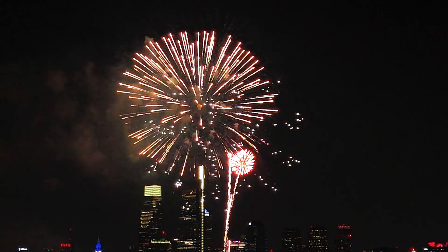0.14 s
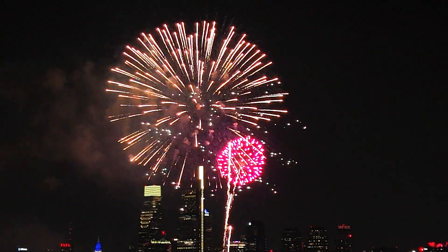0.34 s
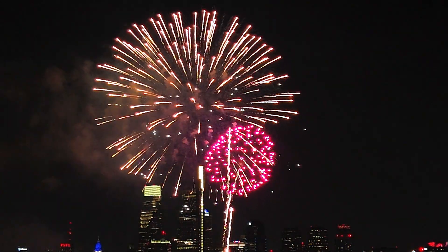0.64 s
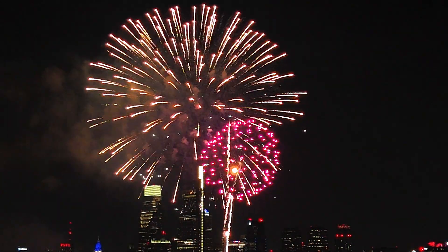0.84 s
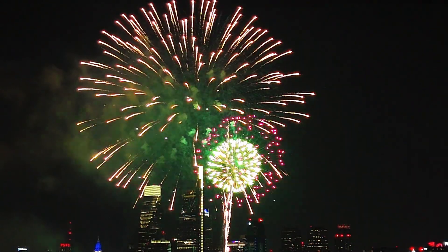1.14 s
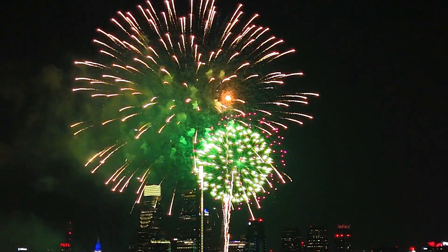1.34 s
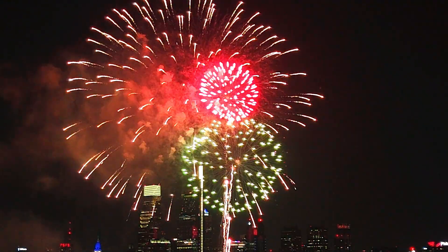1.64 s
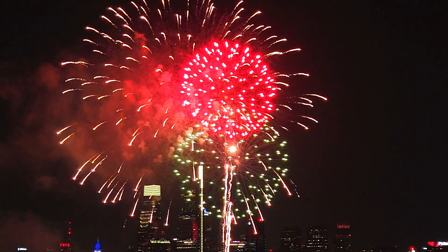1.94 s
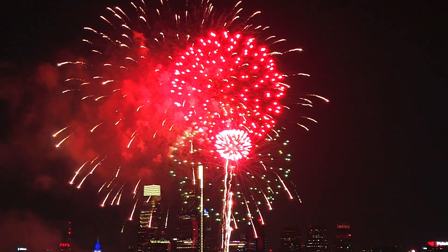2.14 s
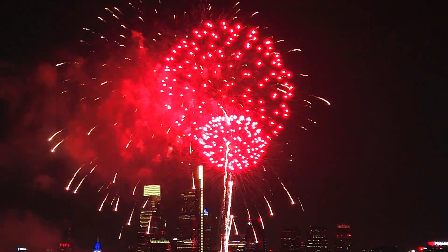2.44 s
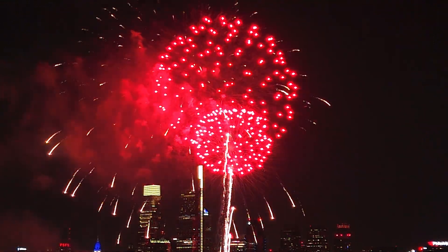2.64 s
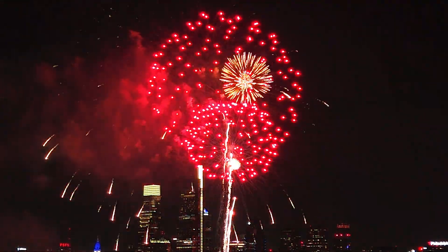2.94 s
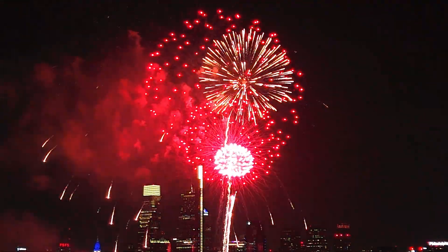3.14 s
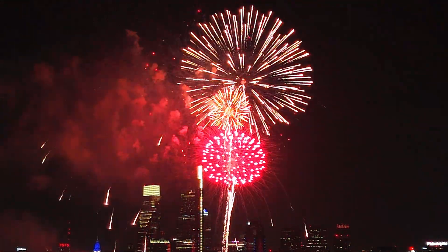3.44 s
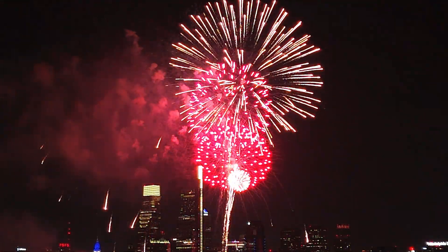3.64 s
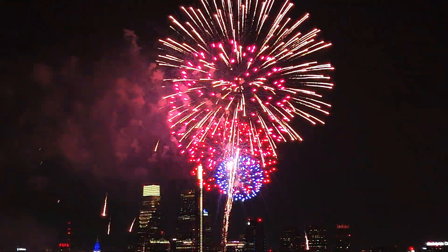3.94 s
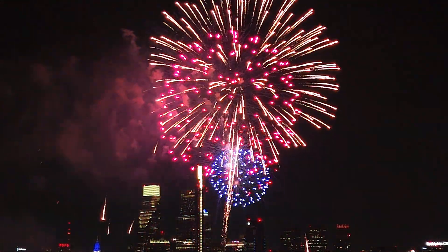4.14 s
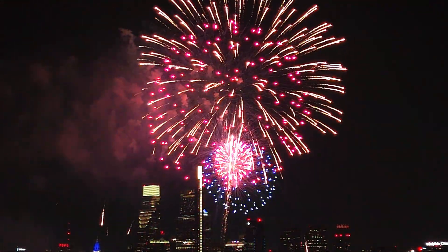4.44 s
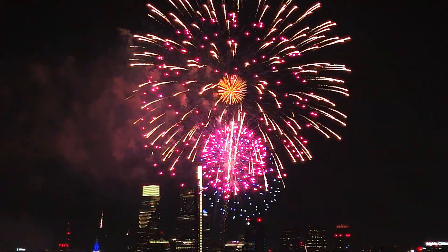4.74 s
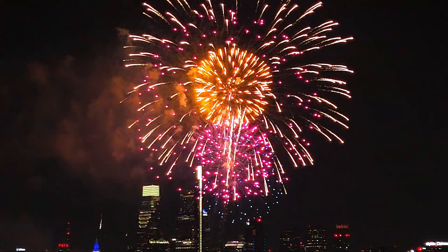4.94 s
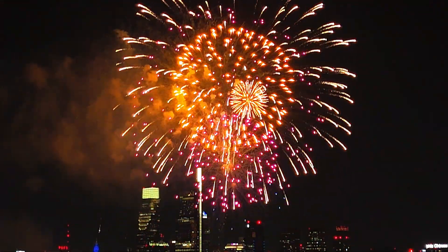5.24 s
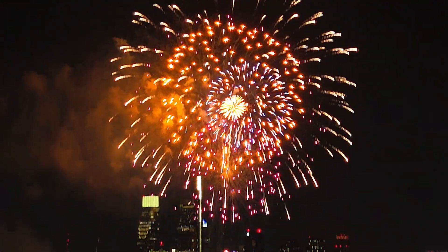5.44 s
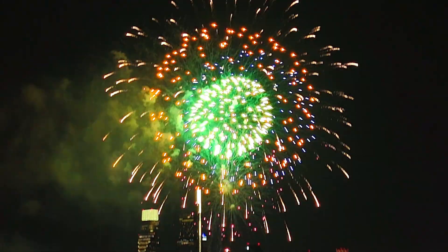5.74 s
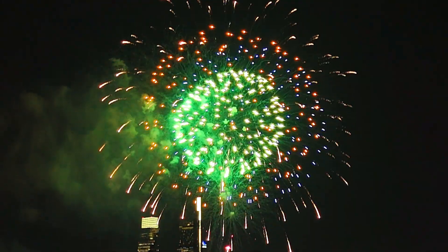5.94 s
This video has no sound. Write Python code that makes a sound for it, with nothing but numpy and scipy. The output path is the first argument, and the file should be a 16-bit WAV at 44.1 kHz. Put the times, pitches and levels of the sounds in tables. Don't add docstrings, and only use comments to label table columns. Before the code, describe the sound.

A wide outdoor night scene of aerial fireworks over a city, picked up by a small camera microphone with little deep bass and a thin steady hiss. For the first 1.3 seconds there are only muttering old echoes, soft launch thuds and muffled far pops, one stronger at 1.2. A big, abrupt, overloaded bang strikes at 1.4, slapping off near walls with bright scatter and a rolling city echo. A weaker one follows at 2.0, then a heavy launch thud at 2.6 and bangs at 2.9, 3.4 (the hardest) and 3.9, the last duller. Muffled pops cluster from 3.6 to 5.1. Double bangs land at 4.8 and 4.9, then 5.37 and 5.44, nearly merging. Faint sharp cracks occur near 1.2, 1.9, 4.3 and 5.95, with tiny spark ticks after 5. Rumbling echoes fade towards 6 seconds, with a last far pop and soft thud.

```python
import sys
import numpy as np
from scipy import signal
from scipy.fft import rfft, irfft, next_fast_len
from scipy.io import wavfile
from scipy.ndimage import uniform_filter1d

SR = 44100
rng = np.random.default_rng(int(sys.argv[2]) if len(sys.argv) > 2 else 0)


def wrap_up_sound(samples):
    columns = np.atleast_2d(samples).T
    tamed = np.clip(columns, -1, 1)
    steps = np.round(tamed * 32767).astype(np.int16)
    wavfile.write(sys.argv[1], SR, steps)


def level_to_linear(level):
    exponent = np.asarray(level, float) / 20
    return 10 ** exponent


N = 269451

# frequency in Hz, level in dB per Hz.
HISS_SPECTRUM = [(900, -22), (1800, 2.5), (2800, 1.5), (3900, -2.5), (4400, -17), (5500, -16.5),
                 (7500, -16.5), (8200, -35.5), (10000, -28.5), (12500, -26.5), (15600, -24.5),
                 (16000, -63.5)]
# frequency in Hz, level in dB rms.
CIRCUIT_TONES = [(6050, -92.5), (12100, -109)]
# time in seconds, strength in dB, depth in dB (deeper when farther travelled).
OLD_ECHOES = [(0.0, -50.5, 2.5), (0.15, -45.5, 0), (0.41, -53, 2.5), (0.58, -45, 3.5), (0.92, -49, -10.5),
              (1.24, -45, -1), (1.6, -39, -17.5), (1.85, -43, -0.5), (2.1, -48, -17), (2.41, -50.5, -1.5),
              (2.85, -44, 12), (3.12, -49, 2), (3.61, -44.5, 11), (3.93, -47.5, 5.5), (4.5, -42.5, -3),
              (5.1, -35.5, 2), (5.449, -42, -3), (6.11, -40, -1.5)]
# frequency in Hz, level in dB per Hz.
BOOM_SPECTRUM = [(15, -74), (30, -47), (60, -12.5), (110, 2.5), (200, -6.5), (300, 3.5), (400, -18.5),
                 (600, -61), (1500, -130)]
# frequency in Hz, level in dB per Hz.
MUTTER_SPECTRUM = [(150, -24.5), (250, -8), (400, 6.5), (600, 3.5), (900, -1.5), (1150, -13), (1500, -31),
                   (2500, -70), (5000, -130)]
# frequency in Hz, level in dB per Hz.
RATTLE_SPECTRUM = [(300, -94.5), (700, -22.5), (1050, 3.5), (1350, 3.5), (1700, -6.5), (2100, -17.5),
                   (3200, -30), (4200, -46.5), (8000, -130)]
# start in seconds, peak in dB, centre in Hz.
LAUNCH_THUDS = [(0.02, -31, 142), (0.114, -26.5, 171), (0.659, -28.5, 207), (0.925, -28.5, 340),
                (1.826, -19.5, 131), (2.561, -20, 140.5), (2.643, -10, 114), (2.721, -24, 196),
                (3.101, -21.5, 140.5), (3.3, -28, 131), (3.513, -13.5, 293), (5.198, -23, 380),
                (6.061, -28, 286)]
# start in seconds, peak in dB, centre in Hz.
FAR_SHELLS = [(0.028, -31.5, 420), (0.125, -27, 510), (0.327, -32, 517), (0.498, -50, 356),
              (0.719, -33, 540), (1.2, -16.5, 450), (1.89, -28, 830), (2.606, -32.5, 547), (3.16, -28, 514),
              (3.354, -34, 510), (3.629, -18, 406), (3.804, -22, 560), (4.014, -21.5, 622),
              (4.261, -20, 620), (4.558, -16.5, 572), (4.676, -22, 620), (4.702, -23, 452),
              (4.959, -14, 434), (5.054, -11, 420), (5.931, -24, 584)]
# start in seconds, peak in dB, centre in Hz.
SHARP_CRACKS = [
    (1.2053, -35.5, 1140),
    (1.274, -42.5, 1370),
    (1.8988, -33, 1100),
    (4.2612, -34.5, 1330),
    (4.5608, -48, 1060),
    (5.9496, -38, 1330),
]
# start in seconds, peak in dB, centre in Hz.
SPARK_TICKS = [
    (5.032, -38, 7000),
    (5.231, -49, 5000),
    (5.256, -53, 5000),
    (5.955, -48, 3500),
    (6.107, -39, 2960),
]
# start in seconds, overload in dB, push length in ms, ground delay in ms,
# front sharpness in Hz.
SHOCK_WAVES = [
    (1.3664, 27.5, 6.3, 1.55, 1180),
    (2.0478, 20, 2.1, 1.024, 664),
    (2.8513, 25.5, 0.98, 0.79, 722),
    (3.4313, 32.5, 2.6, 1.633, 621),
    (3.8885, 30.5, 0.76, 1.24, 375),
    (4.8299, 29, 2.2, 1.59, 721),
    (4.898, 25, 0.87, 1.01, 492),
    (5.3663, 25.5, 2.2, 1.52, 687),
    (5.443, 30.5, 0.41, 0.9, 371),
]
# near walls in dB, spray in dB, spray T60 in seconds,
# spray tilt in dB per octave.
BURST_ECHOES = [(0.5, -38.5, 1.15, -7.5), (-10.5, -47, 0.84, -12.5), (-9.5, -44, 0.56, -10.5),
                (-7, -44.5, 0.81, -10.5), (-10, -45, 0.43, -10), (0.5, -36, 0.81, -7),
                (-7.5, -48, 1.26, -5), (-3, -40.5, 0.91, -8), (-10, -58, 0.73, -15)]
# frequency in Hz, level in dB per Hz.
WALL_SPECTRUM = [(40, -15), (120, -9.5), (230, -3), (400, -9), (800, -5), (1300, -11), (2000, -31),
                 (3700, -28.5), (4600, -42), (8800, -56), (15600, -67), (16000, -100)]
# frequency in Hz, T60 in seconds.
WALL_T60_S = [(60, 0.18), (250, 0.12), (1000, 0.044), (4000, 0.072), (12000, 0.034)]
# frequency in Hz, level in dB per Hz.
CITY_SPECTRUM = [(25, -55.5), (45, -37), (86, 1.5), (160, -1), (304, -0.5), (450, -3), (1100, -14.5),
                 (1600, -22), (2400, -51.5), (4000, -75.5), (8000, -130)]
# frequency in Hz, T60 in seconds.
CITY_T60_S = [(60, 1.3), (200, 1.04), (700, 1.14), (2000, 1)]
# frequency in Hz, level in dB per Hz.
SPRAY_SPECTRUM = [(1000, -7), (1900, 4), (3900, 2.5), (4500, -2.5), (7500, -3), (10000, -8), (15600, -21),
                  (16000, -48.5)]
# frequency in Hz, share of the spray T60.
SPRAY_T60_SHARE = [(2000, 1), (3300, 1), (5000, 0.87), (7500, 0.77), (8500, 0.55), (13000, 0.45)]
# frequency in Hz, sharpness Q.
BASS_ROLLOFFS = [(138, 0.89), (245, 0.32)]

HISS_DB, HISS_FOLLOWS = -69.5, 0.25
RATTLE_DB, RATTLE_FADES = -14, 0.35
CITY_DB, CITY_FOLLOWS = -16.5, 0.91
STRETCH = 0.79
GRAZING_MS, GROUND_LOSS_PER_MS = 1.25, 1.005


def unit(x):
    return x / np.sqrt(np.mean(x ** 2) + 1e-20)


def along(points, hz):
    point_hz, value = np.transpose(points)
    return np.interp(np.log(hz + 1), np.log(point_hz + 1), value)


def add(track, start_s, sound):
    part = track[max(round(start_s * SR), 0):][:len(sound)]
    part += sound[:len(part)]


def filtered(x, response):
    size = next_fast_len(len(x) + 8192)
    return irfft(rfft(x, size) * response(np.fft.rfftfreq(size, 1 / SR)), size)[:len(x)]


def patchy(count, patchy_db, shape=lambda hz, t: 1, frame=256):
    hz, t, z = signal.stft(rng.standard_normal(count), SR, nperseg=frame)
    field = uniform_filter1d(rng.standard_normal(z.shape), size=3, axis=0)
    field = uniform_filter1d(field, size=6, axis=1)
    gain = level_to_linear(patchy_db * unit(field)) * shape(hz[:, None], t)
    return signal.istft(z * gain, SR, nperseg=frame)[1][:count]


def rush(spectrum, patchy_db):
    noise = patchy(N, patchy_db, frame=2048)
    return unit(filtered(noise, lambda hz: level_to_linear(along(spectrum, hz))))


def hiss_and_whine():
    s, strength_db, _ = np.transpose(OLD_ECHOES)
    lift_db = HISS_FOLLOWS * np.interp(np.arange(N) / SR, s, strength_db - strength_db.mean())
    sound = level_to_linear(HISS_DB + lift_db) * rush(HISS_SPECTRUM, patchy_db=1.2)
    for hz, db in CIRCUIT_TONES:
        peak = [(hz - 250, -50), (hz, 0), (hz + 250, -50)]
        sound = sound + level_to_linear(db) * rush(peak, patchy_db=0.5)
    return sound


def old_echoes():
    s, *controls = np.transpose(OLD_ECHOES)
    strength_db, depth_db = (np.interp(np.arange(N) / SR, s, c) for c in controls)
    boom = level_to_linear(depth_db) * rush(BOOM_SPECTRUM, patchy_db=4.0)
    rattle = level_to_linear(RATTLE_DB - RATTLE_FADES * depth_db) * rush(RATTLE_SPECTRUM, patchy_db=1.5)
    mutter = rush(MUTTER_SPECTRUM, patchy_db=2.0)
    return level_to_linear(strength_db) * (boom + mutter + rattle)


def distant_bangs(events, width, level_db, rise_s, t60_s, push):
    out, t = np.zeros(N), np.arange(SR // 3) / SR
    envelope = level_to_linear(-60 * t / max(t60_s, 0.02)) * (1 - np.exp(-t / rise_s))
    pulse = np.exp(-(t / rise_s - 2) ** 2 * 8)
    for start_s, db, centre_hz in events:
        def band(hz):
            s = 1j * hz
            bell = s * width * centre_hz / (centre_hz ** 2 - hz * hz + s * width * centre_hz)
            low_pass = 1 / (1 + s / (2.1 * centre_hz)) ** 4
            high_pass = (s / (s + centre_hz / 2)) ** 2
            return bell ** 2 * low_pass * high_pass

        noise = rng.standard_normal(len(t))
        smear = filtered(noise * envelope, band) / np.std(filtered(noise, band))
        blow = filtered(pulse, band)
        bang = smear - push * blow / np.abs(blow).max()
        add(out, start_s - rise_s - 0.5 / centre_hz, level_to_linear(db + level_db) * bang)
    return out


def answer(spectrum, t60s, stretch, rise_s, patchy_db, count, tilt_db=0, bend=1):
    def colour(hz):
        return level_to_linear(along(spectrum, hz) + tilt_db * np.log2(np.maximum(hz / 3000, 1)))

    def decay(hz, t):
        return level_to_linear(-60 * (t / (stretch * along(t60s, hz))) ** bend)

    tail = filtered(patchy(count, patchy_db, decay), colour)
    colour_rms = np.sqrt(np.mean(colour(np.linspace(0, SR / 2, 4000)) ** 2))
    t = np.arange(count) / SR
    return tail / colour_rms * (1 - np.exp(-(t / rise_s) ** 2))


def front_crackle():
    t = np.arange(SR // 20) / SR
    noise = rng.standard_normal(len(t)) * level_to_linear(-60 * t / 0.006) * (1 - np.exp(-t / 0.00014))

    def ring(hz):
        s = 1j * hz
        return s * 3000 / (3500 ** 2 - hz * hz + s * 3000) / (1 + s / 6500) ** 3
    return filtered(noise, ring)


def buildings():
    out = np.zeros(N)
    for (s, *_), (near_db, spray_db, spray_t60_s, tilt_db) in zip(SHOCK_WAVES, BURST_ECHOES):
        crackle_db = spray_db + 43.5 + 0.2 * (tilt_db + 9)
        add(out, s, level_to_linear(crackle_db) * front_crackle())
        walls = answer(WALL_SPECTRUM, WALL_T60_S, STRETCH, rise_s=0.0044, patchy_db=-2.5, count=SR // 3)
        add(out, s, level_to_linear(near_db) * walls)
        treble_t60 = [(hz, share ** (-tilt_db / 5.2)) for hz, share in SPRAY_T60_SHARE]
        spray = answer(SPRAY_SPECTRUM, treble_t60, spray_t60_s, rise_s=0.0025, patchy_db=1.9, count=SR,
                       tilt_db=tilt_db, bend=1.208)
        add(out, s, level_to_linear(spray_db) * spray)
        city = answer(CITY_SPECTRUM, CITY_T60_S, STRETCH, rise_s=0.008, patchy_db=0.5, count=SR * 3 // 2)
        add(out, s, level_to_linear(CITY_DB + CITY_FOLLOWS * near_db) * city)
    return out


def shocks():
    def arrival(hz):
        s = 1j * hz
        wave = 0
        for start_s, db, push_ms, delay_ms, front_hz in SHOCK_WAVES:
            share = np.clip(1 - GROUND_LOSS_PER_MS * (delay_ms - GRAZING_MS), 0, 1)
            u = 2 * np.pi * s * push_ms / 1000
            push = level_to_linear(db) * push_ms / 1000 * SR * u / (1 + u) ** 2
            dulled = push / (1 + s / front_hz) ** 3
            ground = 1 + share * np.exp(-2 * np.pi * s * delay_ms / 1000)
            wave = wave - dulled * ground * np.exp(-2 * np.pi * s * start_s)
        for cut_hz, q in BASS_ROLLOFFS:
            wave = wave * s * s / (s * s + s * cut_hz / q + cut_hz * cut_hz)
        return wave
    impulse = np.arange(N) == 0
    return filtered(impulse, arrival)


def ledge(x, share, delay_ms=7.13, dull_hz=2500):
    def comb(hz):
        late = np.exp(-2j * np.pi * hz * delay_ms / 1000)
        return 1 - share * late / (1 + (hz / dull_hz) ** 2)
    return filtered(x, comb)


def scene():
    background = old_echoes()
    thuds = distant_bangs(LAUNCH_THUDS, width=0.85, level_db=-7, rise_s=0.00495, t60_s=0.18, push=0.44)
    pops = distant_bangs(FAR_SHELLS, width=0.84, level_db=-11.5, rise_s=0.0011, t60_s=0.14, push=1.5)
    cracks = distant_bangs(SHARP_CRACKS, width=0.45, level_db=-9, rise_s=0.0004, t60_s=0.17, push=1.7)
    ticks = distant_bangs(SPARK_TICKS, width=0.52, level_db=-14, rise_s=0.00015, t60_s=0.02, push=1.5)
    scattered = ledge(background + thuds + pops + cracks + ticks + buildings(), share=0.42)
    heard = filtered(scattered, lambda hz: (1j * hz / (1j * hz + 55)) ** 2)
    direct = ledge(shocks(), share=0.058, delay_ms=6.91, dull_hz=1480)
    return (hiss_and_whine() + heard + direct)[None]


def top_cut(x):
    return signal.sosfilt(signal.butter(12, 17030, fs=SR, output="sos"), x)


def record(dry):
    clipped = np.clip(dry[0], -1, 1)
    mix = filtered(clipped, lambda hz: 1 / (1 + (hz / 15500) ** 8))[None]
    return top_cut(mix)


dry = scene()
out = record(dry)
wrap_up_sound(out)
```